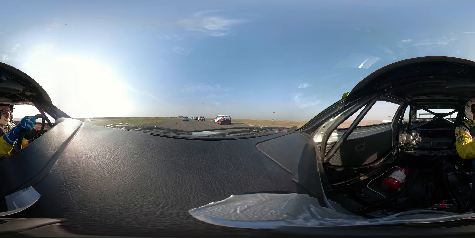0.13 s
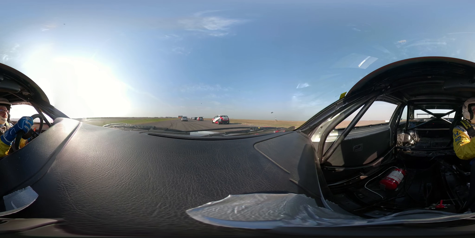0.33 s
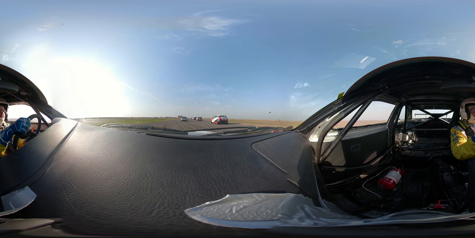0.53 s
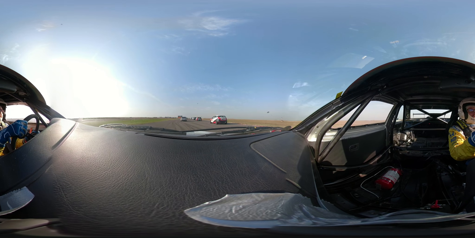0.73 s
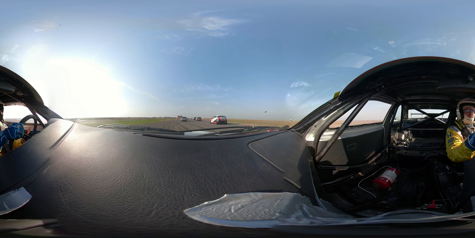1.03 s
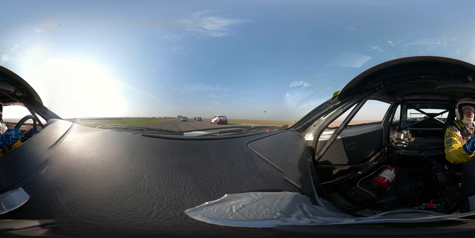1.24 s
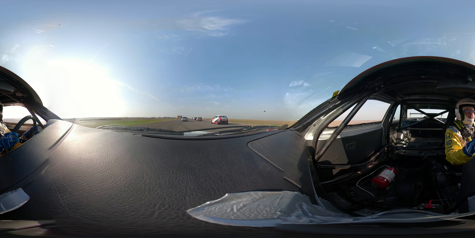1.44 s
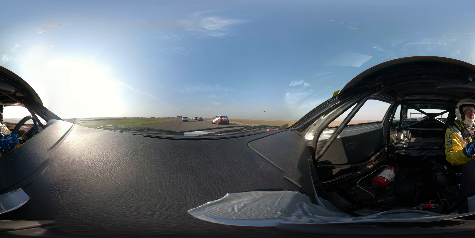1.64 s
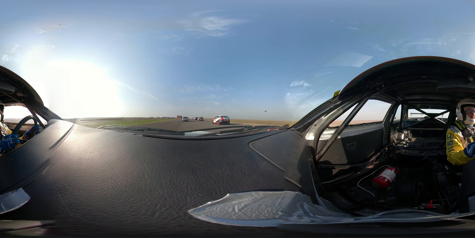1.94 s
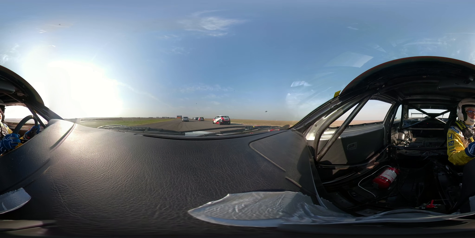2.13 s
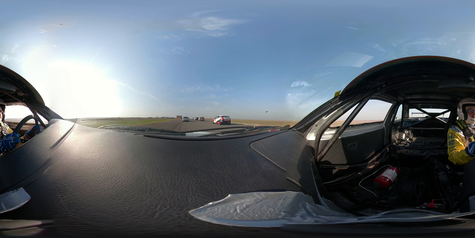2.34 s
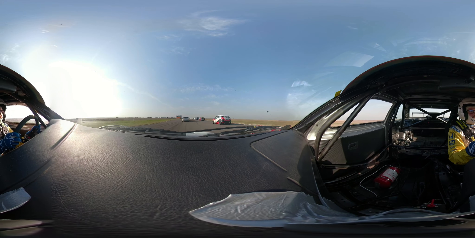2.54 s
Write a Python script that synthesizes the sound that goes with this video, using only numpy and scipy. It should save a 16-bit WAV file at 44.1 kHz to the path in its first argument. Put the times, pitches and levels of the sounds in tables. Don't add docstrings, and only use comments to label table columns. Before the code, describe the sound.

A race car engine heard from inside its stripped, resonant cabin. It comes on quickly in the first 0.2 seconds, then holds a loud, raspy drone rising slightly in pitch until about 1.9, with faint gear whine fading into it, intake hiss and trim rattle. Around 2.0 the throttle lifts and the rasp and hiss drop; from 2.4 they partly return. Lumpy road rumble and light wind run throughout.

```python
import sys
import numpy as np
from scipy import signal
from scipy.fft import rfft, irfft, next_fast_len
from scipy.io import wavfile
from scipy.ndimage import uniform_filter1d, map_coordinates

SR = 44100
rng = np.random.default_rng(int(sys.argv[2]) if len(sys.argv) > 2 else 0)


def linear_from_db(decibels):
    return 10 ** (np.asarray(decibels, float) / 20)


def unload_audio(sound):
    columns = np.transpose(np.atleast_2d(sound))
    steps = np.round(np.clip(columns, -1, 1) * 32767)
    wavfile.write(sys.argv[1], SR, steps.astype(np.int16))


N = 117747
T_S = np.arange(N) / SR


def unit(x):
    return x / np.sqrt(np.mean(x ** 2) + 1e-20)


def curves(rows):
    knot_s, *columns = np.transpose(rows)
    return [np.interp(T_S, knot_s, column) for column in columns]


def wobble(rate_hz):
    return map_coordinates(rng.standard_normal(400), [T_S * rate_hz])


def sine(cycles):
    return np.sqrt(2) * np.sin(2 * np.pi * cycles)


def filtered(x, response):
    m = next_fast_len(N + SR // 2)
    spectrum = rfft(x, m) * response(np.fft.rfftfreq(m, 1 / SR))
    return irfft(spectrum, m)[:N]


def colour(points):
    point_hz, point_db = np.transpose(points)
    return lambda hz: linear_from_db(np.interp(np.log(hz + 1), np.log(point_hz + 1), point_db, -120, -120))


def resonances(peaks):
    return lambda f: sum(linear_from_db(db) * 1j * f * w / (c * c - f * f + 1j * f * w) for c, w, db in peaks)


def boost(peaks, share):
    return lambda f: 1 + share * sum(linear_from_db(db) / (1 + (2 * (f - c) / w) ** 2) for c, w, db in peaks)


def rush(points, patchy_db=1.5):
    z = signal.stft(rng.standard_normal(N + 512), nperseg=512)[2]
    field = uniform_filter1d(rng.standard_normal(z.shape), size=3, axis=0)
    field = uniform_filter1d(field, size=30, axis=1)
    patchy = signal.istft(z * linear_from_db(patchy_db * unit(field)), nperseg=512)[1][:N]
    return unit(filtered(patchy, colour(points)))


def tones(orders, cycles):
    total = np.zeros(N)
    for multiple, level_db in orders:
        level = linear_from_db(level_db + 2.65 * wobble(9.095))
        total += level * sine(round(multiple) * cycles + rng.random())
    return total


# (time [s], level [dB])
ROAD = [(.05, -16.5), (.11, -15), (.18, -23.5), (.5, -22), (.68, -19.5), (.82, -33), (1, -23.5), (1.3, -26),
        (1.6, -21.5), (1.78, -20), (1.95, -17.5), (2.25, -22.5), (2.42, -16), (2.58, -19.5), (2.67, -7)]
# (frequency [Hz], density [dB/Hz])
RUMBLE = [(15, -15.5), (30, -3.5), (50, 8), (80, 2), (130, -7), (250, -4), (600, -28.5)]
# (frequency [Hz], density [dB/Hz])
WIND = [(500, 10.5), (1200, 12), (2200, -4.5), (4300, -10), (6500, -9.5), (8500, -27.5), (11800, -20),
        (15200, -29)]


def road():
    level_db, = curves(ROAD)
    rumble = unit(linear_from_db(1.2 * wobble(42)) * rush(RUMBLE, patchy_db=-2.5))
    wind = linear_from_db(-39 + 0.8 * wobble(12)) * rush(WIND, patchy_db=-0.5)
    return linear_from_db(level_db) * rumble + wind


# (time [s], frequency [Hz], level [dB])
SHAFT = [
    (0, 361, -36.5),
    (.73, 381, -31),
    (1.08, 397.8, -32.5),
    (1.5, 413.3, -39),
    (1.75, 416, -45),
    (2.67, 409.2, -52),
]


def driveline():
    hz, level_db = curves(SHAFT)
    level = linear_from_db(level_db + 1.5 * wobble(23))
    return level * sine(np.cumsum(hz) / SR + 0.02 * wobble(24))


# (time [s], level [dB])
THROTTLE = [(0.05, -50), (0.14, -37), (0.33, -34.5), (0.45, -33), (0.78, -35), (0.82, -36.5), (1.02, -36.5),
            (1.22, -40), (1.9, -33.5), (2.07, -58.5), (2.38, -55.5), (2.46, -46.5), (2.62, -41),
            (2.66, -43)]


def throttle():
    level_db, = curves(THROTTLE)
    median_db = np.median(level_db)
    return level_db - median_db, median_db


# (frequency [Hz], density [dB/Hz])
HISS = [(1800, -57), (2600, -17), (4300, -11.5), (5200, -2.5), (7400, -5.5), (8400, -30), (11500, -20.5),
        (15200, -32)]
# (frequency [Hz], width [Hz], level [dB])
RATTLE = [(2616, 170, -0.5), (3694, 43, 7), (4610, 19, -0.5), (5220, 28, 8), (5460, 29, 8), (5970, 29, 8),
          (5836, 15, 0.5), (6080, 60, -2), (6850, 47, 4.5), (7280, 67, 1.5), (7120, 25, -4.5)]


def intake(firings):
    load_db, median_db = throttle()
    strength = linear_from_db(1.1 * rng.standard_normal(1000)[firings.astype(int) % 1000])
    pulse = (0.5 - 0.5 * np.cos(2 * np.pi * firings)) ** 1.5
    depth = 0.1
    gate = 1 - depth + depth * strength * 2 * pulse
    hiss = unit(gate * rush(HISS))
    shaking = gate * rush([(1500, 0.0089), (9000, 0.033)])
    rattle = unit(filtered(shaking, resonances(RATTLE)))
    level = linear_from_db(median_db + load_db + 0.54 * wobble(8.4))
    return level * (linear_from_db(-2) * hiss + linear_from_db(-5) * rattle)


# (time [s], rate [Hz], level [dB])
FIRING = [(.05, 239.9, -36.5), (.14, 235.2, -19.5), (.24, 228.3, -10.5), (.34, 233.4, -14.5),
          (.45, 239.4, -18.5), (.73, 245.3, -15.5), (.85, 249.1, -11), (1.05, 255.7, -11),
          (1.43, 265.7, -14), (1.57, 266.3, -17), (1.68, 269.3, -38.5), (1.8, 274, -17.5),
          (1.92, 275.8, -22), (2.02, 273.9, -17.5), (2.25, 275.3, -24.5), (2.37, 275.4, -22.5),
          (2.45, 267.3, -13.5), (2.67, 273.3, -16)]


def engine():
    rate_hz, level_db = curves(FIRING)
    return np.cumsum(rate_hz) / SR + 0.0086 * wobble(40) + 1, level_db


# (multiple [1], level [dB])
BARK = [(2, -39.5), (3, -46.5), (4, -46.5), (5, -56.5), (6, -58), (7, -60), (8, -60.5), (9, -65), (10, -68),
        (11, -59.5), (12, -69.5), (13, -68), (14, -65.5), (15, -69), (16, -74)]
# (time [s], level [dB])
RASP = [(.05, -9.5), (.15, -3), (.21, 3.5), (.33, 3), (.4, 1.5), (.72, 1), (.8, -3.5), (1.1, 2), (1.6, -1),
        (1.7, 1), (1.94, 0), (1.99, -12.5), (2.4, -12), (2.67, -7.5)]
# (multiple [1], level [dB])
UNEVEN = [(1, -34.5), (2, -36.5), (3, -27.5), (4, -27.5), (5, -28), (7, -39.5), (8, -41), (9, -30.5),
          (10, -39.5), (11, -52), (13, -52.5), (14, -63), (15, -55.5), (16, -61.5), (17, -57.5),
          (20, -61.5), (21, -50.5), (23, -57.5), (27, -67.5)]
# (frequency [Hz], density [dB/Hz])
ROAR = [(90, 1.5), (200, 9.5), (290, -1), (350, -0.5), (600, -14), (1300, -18.5), (2000, -30), (4000, -41)]
# (frequency [Hz], width [Hz], level [dB])
CABIN = [(117, 8, -1.5), (488.6, 16.1, 13), (546.2, 23, 11.5), (626, 24.7, 19.5), (711, 39, 10),
         (801, 85, 5.5), (1102.5, 22, 9.5), (1151, 24, 17), (1235, 43, 20), (1380, 44, 18.5),
         (1605, 87, 8.5), (1949, 33, 10.5), (2376, 45, 16.5), (3686, 180, 16)]


def exhaust(firings, firing_db):
    load_db = throttle()[0]
    firing = linear_from_db(firing_db + 0.17 * wobble(30.54)) * sine(firings)
    rasp_db, = curves(RASP)
    bark = linear_from_db(0.12 * load_db + rasp_db) * tones(BARK, firings)
    full_cycles = firings / 6 + 0.004 * wobble(25.39)
    uneven = linear_from_db(0.31 * load_db) * tones(UNEVEN, full_cycles)
    roar = linear_from_db(-25 + 0.21 * load_db + 0.7 * wobble(5.966)) * rush(ROAR)
    cabin_tones = filtered(bark + uneven, boost(CABIN, share=1))
    cabin_roar = filtered(roar, boost(CABIN, share=0.1))
    return firing + cabin_tones + cabin_roar


def scene():
    firings, firing_db = engine()
    return (road() + driveline() + intake(firings) + exhaust(firings, firing_db))[None]


def low_pass(x):
    return signal.sosfilt(signal.butter(12, 15290, fs=SR, output="sos"), x)


def record(dry):
    start_s, fade_s, ceiling = 0.036, 0.02, 0.95
    x = dry * np.clip((T_S - start_s) / fade_s, 0, 1) ** 1.25
    mix = x / (1 + np.abs(x / ceiling) ** 4) ** (1 / 4)
    return low_pass(mix)


dry = scene()
out = record(dry)
unload_audio(out)
```